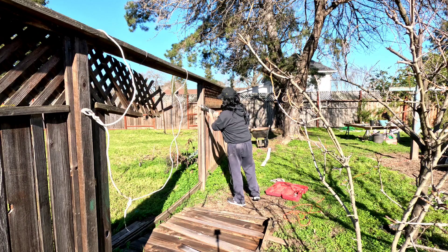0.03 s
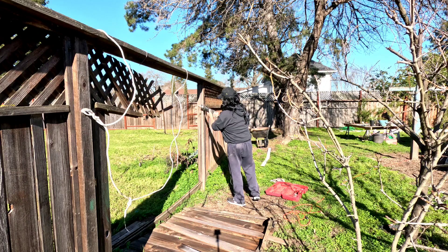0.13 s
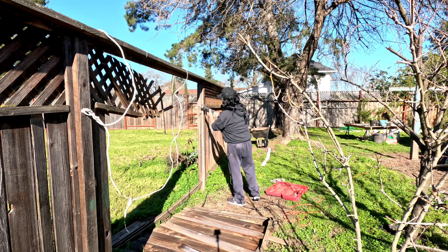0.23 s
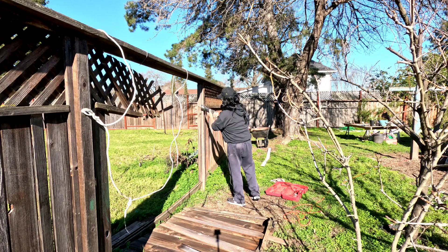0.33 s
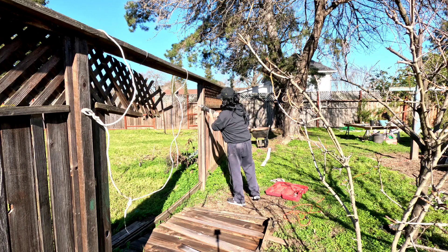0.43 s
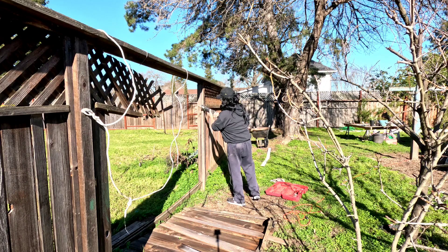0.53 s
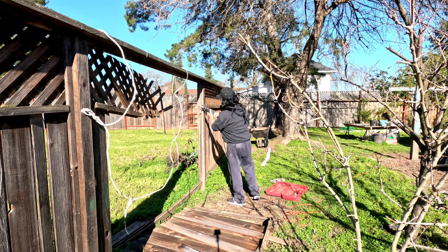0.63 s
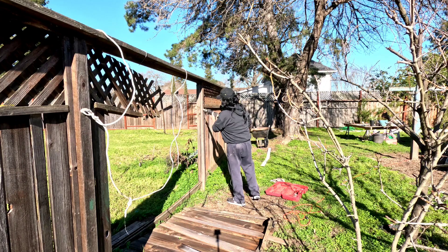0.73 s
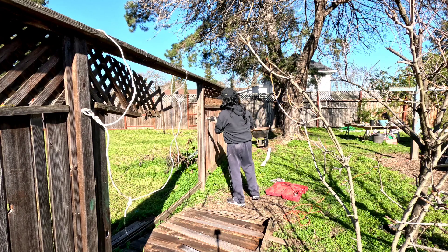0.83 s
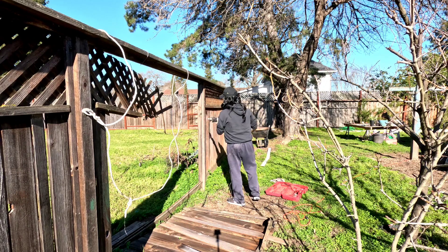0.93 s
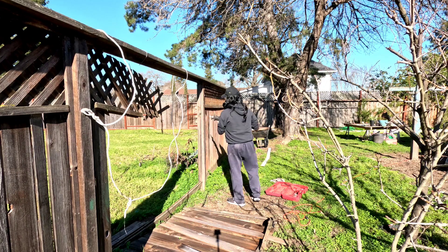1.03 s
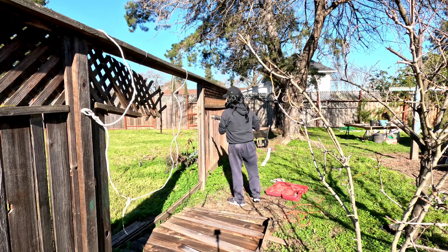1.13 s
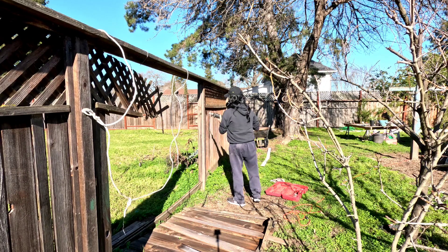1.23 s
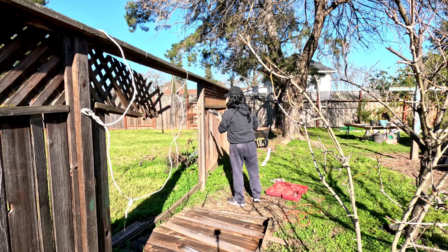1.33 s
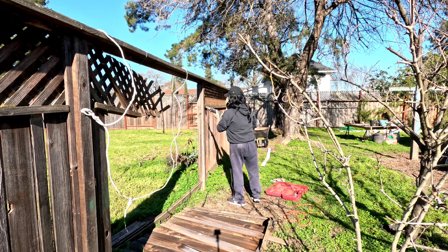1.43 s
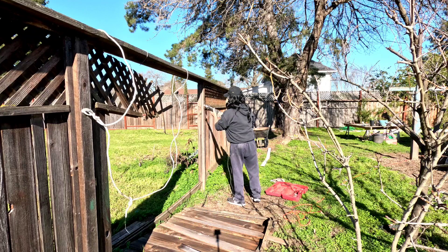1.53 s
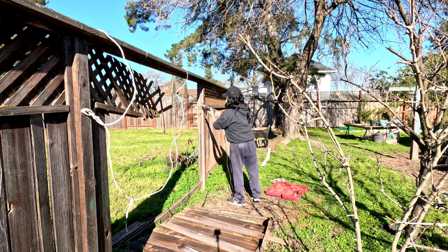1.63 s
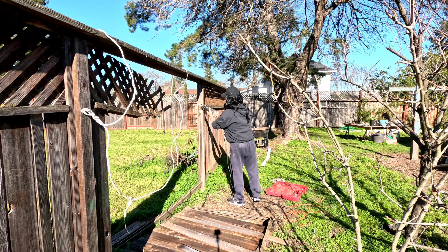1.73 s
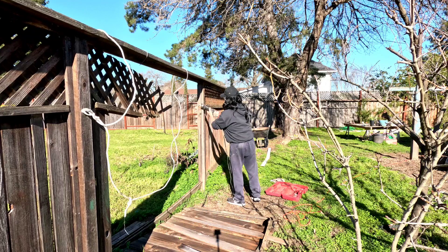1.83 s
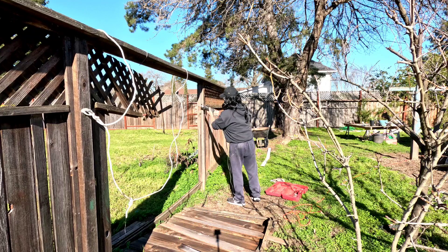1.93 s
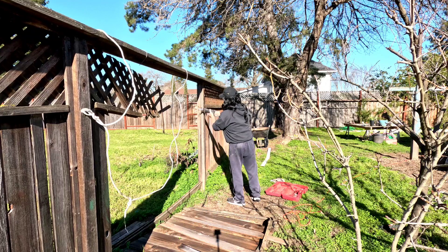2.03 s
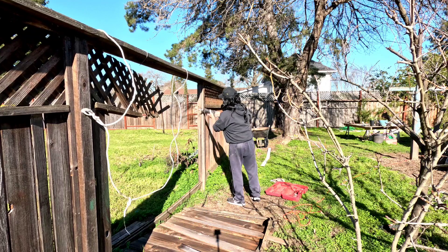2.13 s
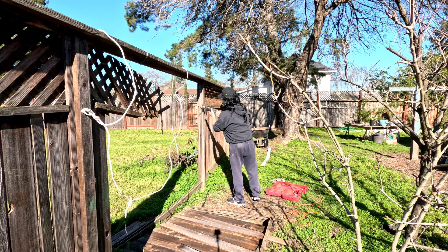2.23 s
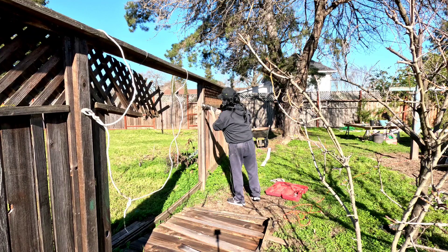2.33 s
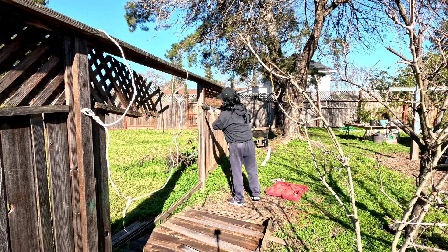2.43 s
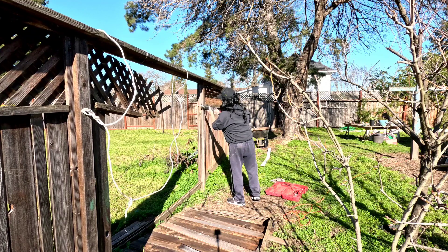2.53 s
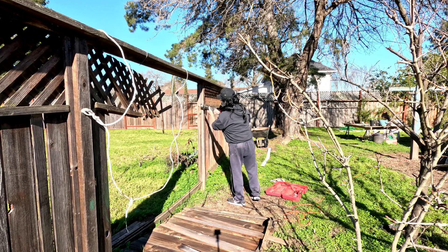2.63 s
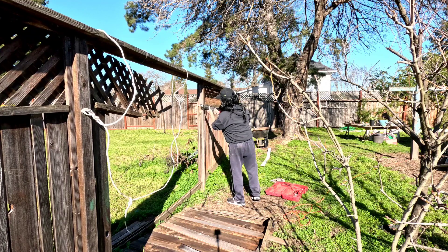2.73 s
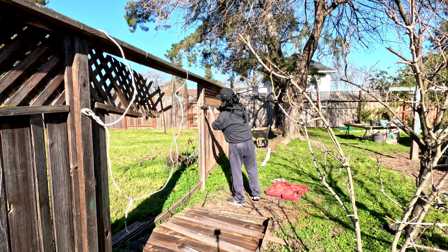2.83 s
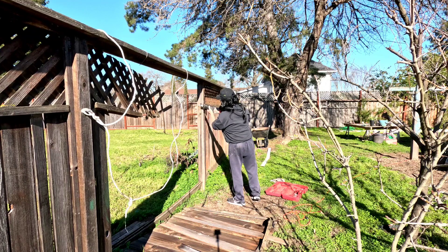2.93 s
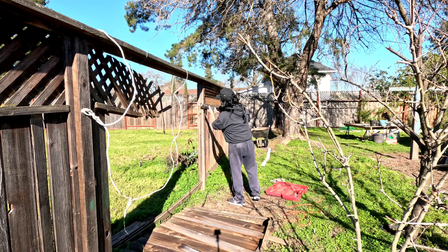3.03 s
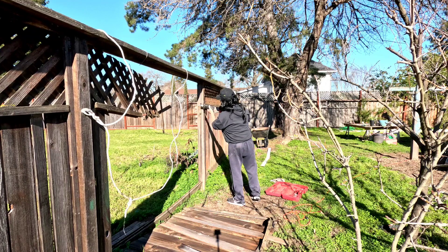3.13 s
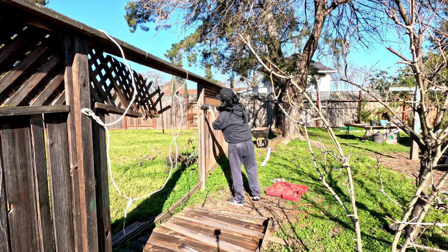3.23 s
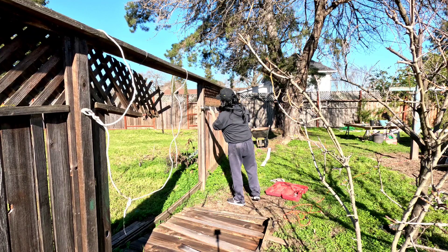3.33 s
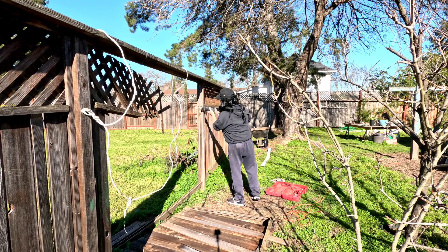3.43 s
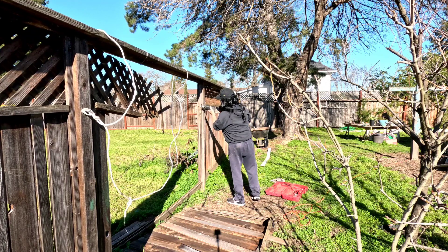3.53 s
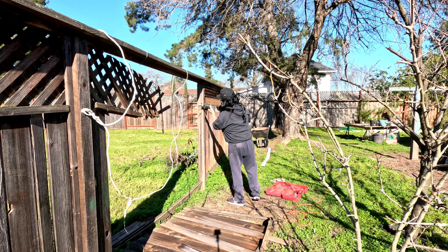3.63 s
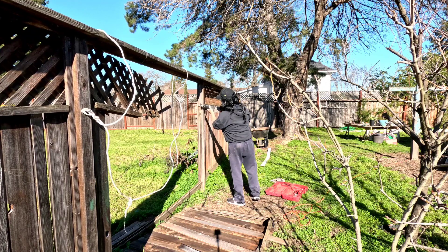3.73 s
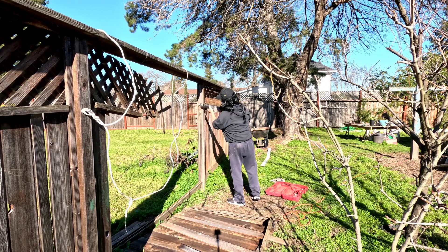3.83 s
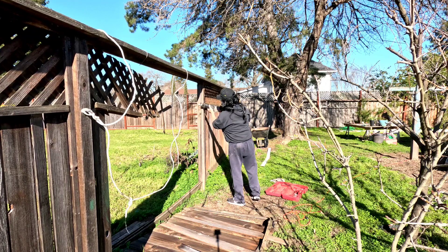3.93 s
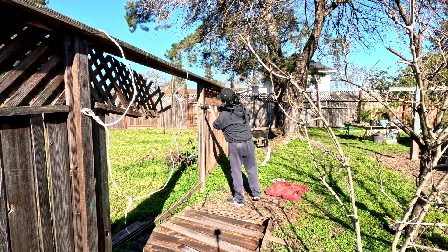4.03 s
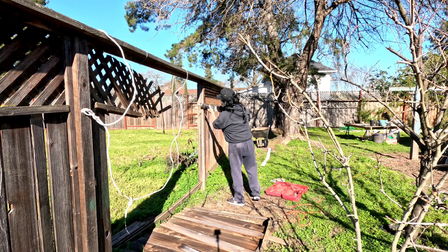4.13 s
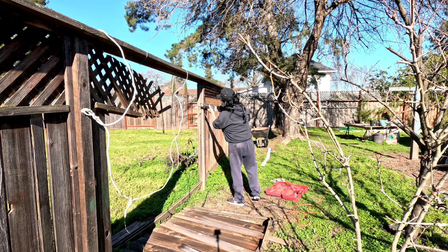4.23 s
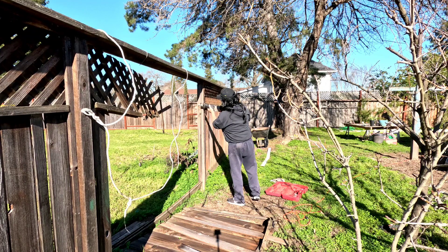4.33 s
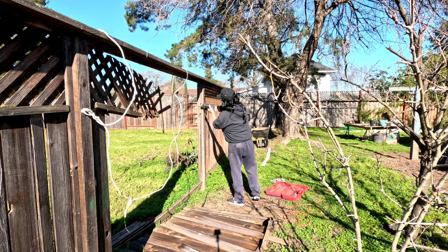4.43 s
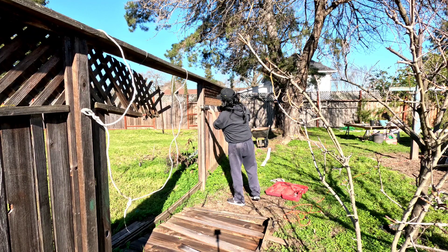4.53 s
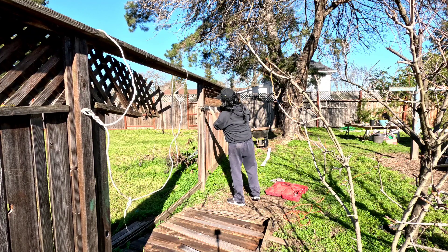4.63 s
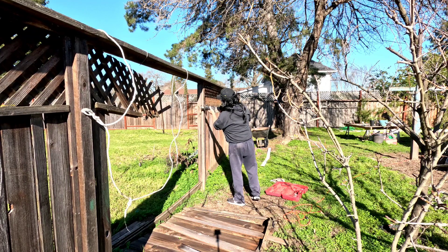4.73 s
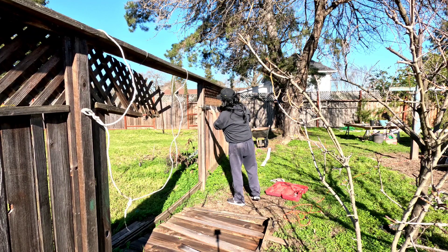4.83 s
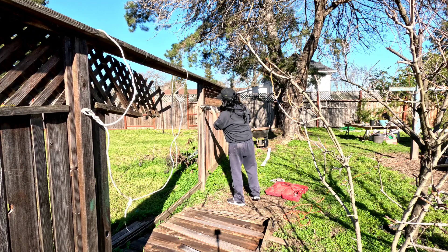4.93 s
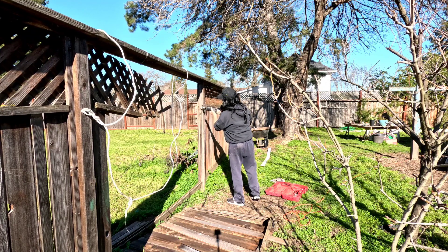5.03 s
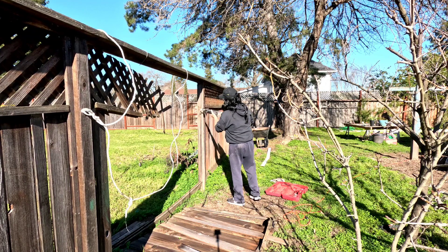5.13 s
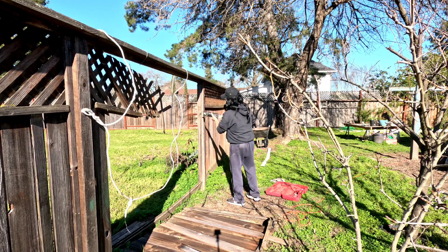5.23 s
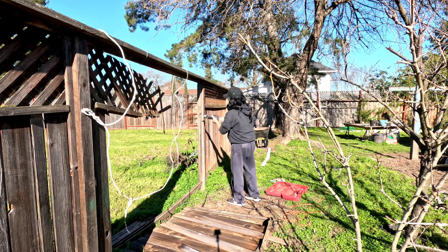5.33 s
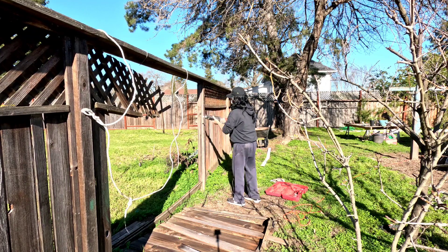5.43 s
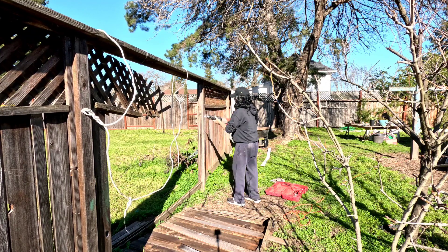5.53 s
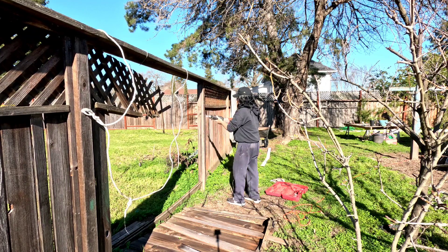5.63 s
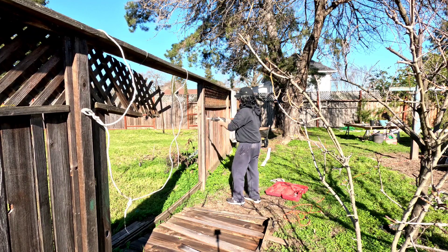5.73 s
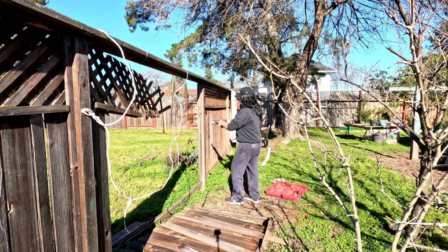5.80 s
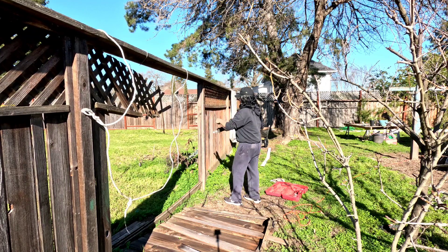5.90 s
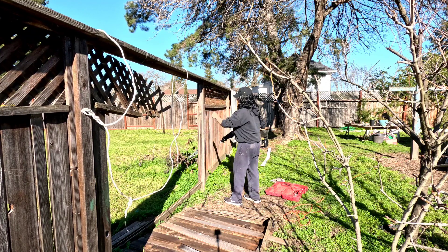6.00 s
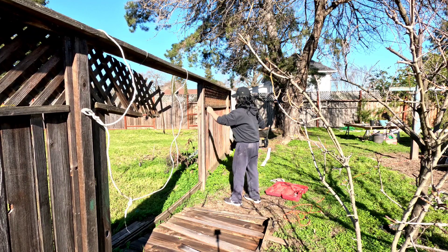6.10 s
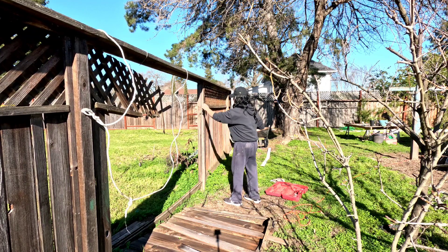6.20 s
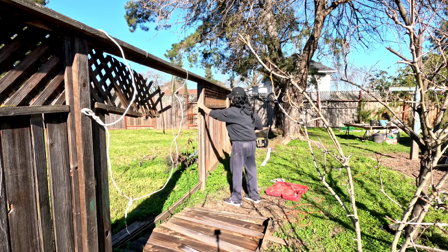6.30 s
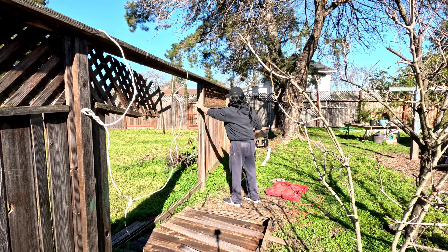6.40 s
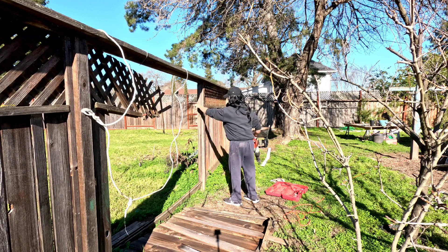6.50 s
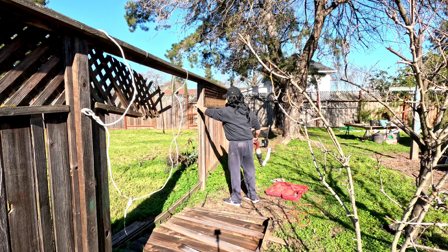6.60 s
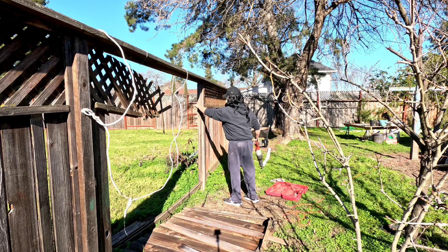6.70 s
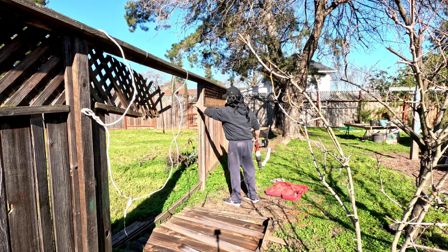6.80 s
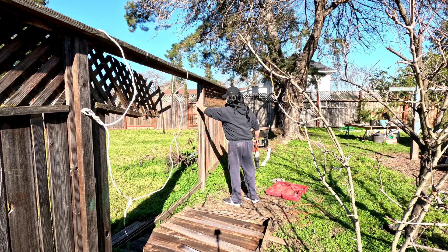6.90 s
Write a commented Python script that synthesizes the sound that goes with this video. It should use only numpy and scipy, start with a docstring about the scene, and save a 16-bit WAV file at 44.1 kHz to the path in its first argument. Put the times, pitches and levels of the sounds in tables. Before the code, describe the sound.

A reciprocating saw rasps harshly through a screw in a wooden fence, coasts, revs again with sharp board knocks, then winds down to slow clatter.

```python
"""A reciprocating saw cuts a screw in a wooden fence, a few metres away in a back yard, heard at two close ports.
The teeth rasp to and fro and shake the boards until the screw gives: noise rings the blade, tones move the boards.
The motor coasts, is run up again and rattles at full speed while the blade knocks three times against the fence,
then winds down to a slow clatter. Rattle and hiss are dense impacts, the whine follows the motor speed,
and the knocks ring the boards. Echoes come off the fences over a low outdoor rumble and a faint hum."""
import sys
import numpy as np
from scipy import signal
from scipy.fft import rfft, irfft
from scipy.io import wavfile
from scipy.ndimage import uniform_filter1d, map_coordinates

SR = 44100
rng = np.random.default_rng(int(sys.argv[2]) if len(sys.argv) > 2 else 0)


def persist_wave(psi):
    """Save psi, clipped to +-1, as 16-bit WAV."""
    counts = np.round(np.clip(psi, -1, 1) * 32767).astype(np.int16)
    wavfile.write(sys.argv[1], SR, np.atleast_2d(counts).T)


N = 306936
TIME = np.arange(N) / SR
FREQS = np.maximum(np.fft.rfftfreq(N, 1 / SR), 1)

# Motor speed is given as the pitch of its gear whine: running free, and in the cut.
FREE_HZ, CUT_HZ = 9040, 8718
WHINE_PER_STROKE, WHINE_PER_TURN = 198.5, 20  # whine cycles per blade stroke and per shaft turn
CUT_END_S = .875
# The screw works loose between these times.
LOOSEN_S, LOOSE_S = 0.25, 0.8
# Share of the rasp's power that repeats from stroke to stroke.
STEADY_TIGHT, STEADY_LOOSE = .66, .22
RASP_DB = -13.5
BOOM_TIGHT_DB, BOOM_LOOSE_DB = -30, -22.5
BUZZ_TIGHT_DB, BUZZ_LOOSE_DB = -29, -33

# Blade resonances, each rung at its own place in the stroke.
# Each row: pitch in Hz, width in Hz, relative level in dB, place in the stroke from 0 to 1.
BLADE_RESONANCES = [(908, 24, 3.5, 0.63), (1300, 41, 9, 1), (1815, 34, 10.5, 0.73), (2340, 250, 8, 0.08),
                    (2820, 570, 0, 0.67), (2883, 67, 13, 1), (3280, 92, -12, 0.8), (3830, 400, -4, 0.77),
                    (4860, 190, 8, 0.54), (5600, 360, 3.5, 0.64), (5960, 200, -5.5, 0.68),
                    (7070, 960, -4.5, 0.97), (8870, 160, -0.5, 0.91), (9870, 290, -5, .93)]
# Colour of the teeth against the screw. Each row: frequency in Hz, relative density in dB per Hz.
RASP_COLOUR = [(240, -49), (400, -13), (795, -4), (898, 3), (1110, -6), (1310, -1), (2050, -2), (2240, 0),
               (2910, 1), (4060, -4), (4880, -0.5), (6520, -12.5), (10300, -14), (14000, -25), (15300, -54)]
# Motion of the shaken boards, five slow tones that boom and then those that buzz.
# Each row: multiple of the stroke rate, relative level in dB.
BOARD_ORDERS = [(1, -18), (2, -8), (3, -1), (4, 1), (5, -10), (6, 4), (7, -24), (8, 3), (9, -8), (10, -18),
                (11, -33), (12, -6)]


def cutting(strokes):
    """Teeth ring the blade at a firm and a lighter touch in each stroke, and the screw shakes the boards."""
    boom_db = loosening(BOOM_TIGHT_DB, BOOM_LOOSE_DB)
    buzz_db = loosening(BUZZ_TIGHT_DB, BUZZ_LOOSE_DB)
    loose = 1 - loosening(STEADY_TIGHT, STEADY_LOOSE)
    bite = teeth(strokes) * from_db(2.6 * loose * drift(30))
    shaken = strokes + 0.024 * loose * drift(68)

    ringing = 0
    for hz, width, db, place in BLADE_RESONANCES:
        touch = lobe(shaken, place, width=.072) + .16
        ringing = ringing + resonance(bite * touch, hz, width, db)
    ringing = rms_one(signal.sosfilt(signal.butter(6, 10500, fs=SR, output="sos"), ringing))

    firm = lobe(shaken, centre=.955, width=.06)
    light = .42 * lobe(shaken, centre=.61, width=.08)
    contact = firm + light + .2
    scraping = colour(teeth(strokes) * contact, RASP_COLOUR)
    rasp = from_db(-2.5) * ringing + from_db(-4.5) * scraping

    tones = []
    for order, db in BOARD_ORDERS:
        tones.append(from_db(db) * np.sin(2 * np.pi * (round(order) * shaken + rng.random())))
    boom, buzz = rms_one(sum(tones[:5])), rms_one(sum(tones[5:]))
    boards = from_db(boom_db) * boom + from_db(buzz_db) * buzz
    boards *= 1 + 0.13 * loose * drift(60)
    until_cut_ends = np.clip((CUT_END_S - TIME) / .014, 0, 1)
    return (from_db(RASP_DB) * rasp + boards) * until_cut_ends


def teeth(strokes):
    """The same teeth cross the screw on every stroke, less exactly as the screw loosens."""
    steady = loosening(STEADY_TIGHT, STEADY_LOOSE)
    place = strokes % 1 * SR * WHINE_PER_STROKE / CUT_HZ
    pattern = rms_one(map_coordinates(rng.standard_normal(2048), [place], order=3, mode="wrap"))
    return np.sqrt(steady) * pattern + np.sqrt(1 - steady) * grains(per_s=9000, spread_db=3)


def loosening(tight, loose):
    """Glide from one value to the other as the screw works loose."""
    return np.interp(TIME, [LOOSEN_S, LOOSE_S], [tight, loose])


# Trigger held. Each row: pressed in seconds, let go in seconds.
TRIGGER_HELD = [(0, 1.15), (2.0, 5.01)]


def powered():
    """1 while the trigger is held, 0 while the motor coasts."""
    return sum((TIME >= on) & (TIME < off) for on, off in TRIGGER_HELD) * 1.0


# From this time the screw binds and slows the motor steadily.
BIND_S, BIND_HZ_PER_S = .55, 520
# Time constants of spin-up near free speed and of coasting; the pull doubles at a lag of HARD_PULL_HZ.
SPIN_UP_S, HARD_PULL_HZ, COAST_S = .45, 2440, 1.5
STEP_S = .001

# Blade striking the fence. Each row: start in seconds, crack level in dB, thud level in dB,
# loss per rebound in dB, motor speed lost in Hz of whine (negative is a gain).
KNOCKS = [(0.883, 4, -5, 35, 650.5), (0.913, -33, -3, 8, 0), (0.986, -24, -13.5, 16, 0),
          (1.028, -15.5, -16, 12, 0.5), (2.205, 6, -2.5, 29, 0), (2.263, -24, -14, 8, -0.5),
          (3.483, 1.5, 0, 7, 140.5), (4.688, 2, 3.5, 12, 159.5)]


def motor_speed(power):
    """The screw holds the motor back; then power pulls it to free speed, friction slows it, knocks check it."""
    ticks = np.arange(0, TIME[-1], STEP_S)
    checks = {int(s / STEP_S): lost_hz for s, *_, lost_hz in KNOCKS}
    speeds = []
    for tick, (s, on) in enumerate(zip(ticks, np.interp(ticks, TIME, power))):
        if s < CUT_END_S:
            hz = CUT_HZ - BIND_HZ_PER_S * max(s - BIND_S, 0)
        else:
            lag = FREE_HZ - hz
            pull = lag * (1 + lag / HARD_PULL_HZ) / SPIN_UP_S
            friction = -hz / COAST_S
            hz += STEP_S * (pull if on else friction) - checks.get(tick, 0)
        speeds.append(hz)
    return np.interp(TIME, ticks, speeds)


# Running mechanism: level before the gains below, and rise with speed.
RATTLE_DB, RATTLE_DB_PER_OCTAVE = -19.5, 8
HISS_DB, HISS_DB_PER_OCTAVE = -23, 13.5
# Gain under power (rattle, hiss), and gain at full motor effort.
POWER_DB, HISS_POWER_DB, EFFORT_DB = 1, 1.5, 10
FULL_SLACK = 0.55  # share of the rattle in clacks at the stroke ends, approached as the motor slows
HISS_FACING = 1.23  # the treble is screened more
CLACK_RING_DB, CLACK_RING_HZ, CLACK_RING_WIDTH_HZ = -29.5, 2780, 350

# The saw is turned about and screened by the body. Each row: time in seconds, level towards the listener in dB.
FACING = [(.9, -6.5), (1.06, -9), (1.27, -8.5), (1.95, 2.5), (2.35, -1.5), (3.05, 1.73), (3.75, 0),
          (4.6, 1.5), (4.85, -1.67), (6.08, 3.1), (6.5, -1), (6.96, 2.5)]
# Colour of the mechanism at speed. Each row: frequency in Hz, relative density in dB per Hz.
RATTLE_COLOUR = [(71, -1), (120, -12), (189, -6.5), (250, -14.5), (452, -13), (580, -15), (805, -4.5),
                 (1050, -5), (1150, -4.5), (1230, -3), (2260, -0.5), (3130, -1), (3380, -4), (4210, -5),
                 (5000, -11.5), (6500, -72), (11000, -120)]
# Colour of the mechanism when slow. Each row: frequency in Hz, relative density in dB per Hz.
COASTING_COLOUR = [(300, -8.5), (450, -16.5), (550, -11), (770, -7), (900, -4), (1000, -4.5), (1200, -1),
                   (1400, -3.5), (1750, -4.5), (2000, -7.5), (2200, -4), (3000, -4.5), (3500, -7),
                   (5000, -14)]
# Colour of its fine treble. Each row: frequency in Hz, relative density in dB per Hz.
HISS_COLOUR = [(3000, -0.5), (4200, -8), (5100, 1), (6000, -3.5), (7400, -3.5), (8300, -7), (9400, -7.5),
               (10200, -5), (11000, -12.5), (12000, -19.5), (14200, -22.5), (15000, -93)]


def mechanism(strokes, whine_hz, trigger, take_up_s=0.033, clack_place=0.25):
    """Gears and slider rattle densely at speed; as they slow, the two clacks of each stroke stand apart."""
    power = fade(trigger, take_up_s) / (take_up_s * SR)
    slowness, octaves = 1 - whine_hz / FREE_HZ, np.log2(whine_hz / FREE_HZ)
    effort = power * slowness
    facing_db, = in_time(FACING)
    rattle_db = RATTLE_DB + RATTLE_DB_PER_OCTAVE * octaves + POWER_DB * power
    rattle_db = rattle_db + EFFORT_DB * effort + facing_db
    hiss_db = HISS_DB + HISS_DB_PER_OCTAVE * octaves + HISS_POWER_DB * power
    hiss_db = hiss_db + EFFORT_DB * effort + HISS_FACING * facing_db

    slack = np.clip(FULL_SLACK * slowness, 0, 1)
    one_end = lobe(strokes, clack_place, width=.085)
    other_end = .95 * lobe(strokes, clack_place + .5, width=.075)
    clacks = rms_one(one_end + other_end)
    beat = np.sqrt(1 - slack + slack * (clacks * from_db(.9 * drift(25))) ** 2)

    fast = np.clip((whine_hz - 3500) / 5000, 0, 1)
    rattle = np.sqrt(fast) * colour(beat * grains(per_s=8000, spread_db=2.5), RATTLE_COLOUR)
    rattle += np.sqrt(1 - fast) * colour(beat * grains(per_s=7000, spread_db=3.0), COASTING_COLOUR)

    hiss = colour(np.sqrt(beat) * grains(per_s=22000, spread_db=4.0), HISS_COLOUR)
    dull = rms_one(resonance(hiss, hz=5230, width=4000, db=0))  # slow impacts lose their top
    bright = np.clip((whine_hz - 2800) / 3000, .15, 1)
    hiss = bright * hiss + (1 - bright) * dull

    clack_noise = colour(clacks ** 2 * rng.standard_normal(N), COASTING_COLOUR)
    ring = slack * rms_one(resonance(clack_noise, CLACK_RING_HZ, CLACK_RING_WIDTH_HZ, db=0))
    impacts = from_db(rattle_db) * rattle + from_db(hiss_db) * hiss
    impacts += from_db(CLACK_RING_DB + facing_db) * ring
    after_cut = np.clip((TIME - CUT_END_S) / 0.0013, 0, 1)
    return after_cut * impacts + motor(whine_hz, beat, power, effort)


# Gains at full motor effort, and housing levels under power and coasting.
WHINE_EFFORT_DB, HOUSING_EFFORT_DB = 33, 28
HOUSING_POWERED_DB, HOUSING_COASTING_DB = -37, -37
HUSH_HZ, HUSH_DB_PER_OCTAVE = 3340, 22  # below this motor speed the lesser tones die away

# How the gearbox radiates its whine. Each row: whine pitch in Hz, level in dB.
WHINE_COLOUR = [(2400, -47), (3200, -46), (3900, -57), (4600, -40), (4950, -35), (5350, -46), (6600, -38),
                (7100, -37.5), (7700, -35.5), (8200, -37.5), (9000, -43)]
# The whine swells and fades. Each row: time in seconds, gain in dB.
WHINE_SWELL = [(.9, -22), (1.1, 1), (1.8, -9), (2.15, 0), (2.5, 1.5), (2.75, 12.5), (3.15, -16), (3.85, 13),
               (4.2, 5), (4.6, 7.5), (6, 2.5)]
# Lesser motor tones. Each row: multiple of the shaft speed, relative level in dB.
MOTOR_ORDERS = [(5, -2.5), (13, 0), (16, 7), (18, 7.5)]
# Resonances of the saw housing. Each row: pitch in Hz, width in Hz, gain in dB.
HOUSING_RESONANCES = [(940, 40, -13), (1165, 23, 1), (1404, 200, 10), (1940, 190, 1), (2470, 370, -8),
                      (3000, 230, -8), (4570, 220, 1)]


def motor(whine_hz, beat, power, effort):
    """Gear whine follows the shaft; lesser tones flare as they sweep through the housing's resonances."""
    hz, db = np.transpose(WHINE_COLOUR)
    swell_db, = in_time(WHINE_SWELL)
    whine_db = np.interp(whine_hz, hz, db) + swell_db + WHINE_EFFORT_DB * effort
    ring_db = power * HOUSING_POWERED_DB + (1 - power) * HOUSING_COASTING_DB + HOUSING_EFFORT_DB * effort
    ring_db += HUSH_DB_PER_OCTAVE * np.minimum(np.log2(whine_hz / HUSH_HZ), 0)

    turns = np.cumsum(whine_hz * (1 + .0016 * drift(70))) / SR / WHINE_PER_TURN
    whine = from_db(whine_db + 3.7 * drift(25)) * np.sin(2 * np.pi * WHINE_PER_TURN * turns)
    jerked = turns + 0.011 * drift(57)
    tones = 0
    for order, db in MOTOR_ORDERS:
        tones = tones + from_db(db + 2 * drift(40)) * np.sin(2 * np.pi * round(order) * jerked)
    # the plastic shell passes little treble
    driven = signal.sosfilt(signal.butter(4, 5000, fs=SR, output="sos"), tones * beat ** 2)
    return whine + from_db(ring_db) * sum(resonance(driven, *mode) for mode in HOUSING_RESONANCES)


REBOUND_STROKES = 2
GLANCING_DB = 3  # further loss of every rebound's crack

# Colour of the metal crack. Each row: frequency in Hz, relative density in dB per Hz.
CRACK_COLOUR = [(200, 14), (700, -8.5), (1500, 7), (3200, 7), (5000, 8.5), (7000, -2.5), (10000, 0),
                (12000, -38), (15000, -36)]
# Loose boards trembling after a blow. Each row: frequency in Hz, relative density in dB per Hz.
TREMBLE_COLOUR = [(80, 7), (130, -5), (220, 2), (320, -1), (430, -6), (620, -8.5), (900, -4.5)]
# Fence boards. Each row: pitch in Hz, gain in dB, time to fall by 60 dB in seconds.
FENCE_MODES = [(91.5, -11, 0.098), (136, -1.5, 0.069), (173, -11.5, 0.1), (223, -3, 0.056),
               (315, -1.5, 0.056), (356, -11, 0.038), (460, -8.5, 0.037), (586, 4.5, 0.019)]


def knocks(whine_hz, crack_s=0.0041, flex_s=0.00893, push_s=0.0014, tremble_s=0.064, tremble_db=-21):
    """A metal crack, then the boards flex, thud and tremble; the blade rebounds every other stroke, ever weaker."""
    cracks, pushes = np.zeros(N), np.zeros(N)
    for s, crack_db, thud_db, loss_db, _ in KNOCKS:
        rebound_s = REBOUND_STROKES * WHINE_PER_STROKE / whine_hz[int(s * SR)]
        for k in range(4):
            hit_s = s + k * rebound_s
            cracks[int(hit_s * SR)] += from_db(crack_db - k * loss_db - (k > 0) * GLANCING_DB)
            pushes[int((hit_s + flex_s) * SR)] += from_db(thud_db - k * loss_db)
    out = fade(cracks, crack_s) * colour(rng.standard_normal(N), CRACK_COLOUR)
    out += from_db(tremble_db) * fade(pushes, tremble_s) * colour(rng.standard_normal(N), TREMBLE_COLOUR)
    force = fade(pushes, push_s) / (push_s * SR)
    # an open fence radiates little deep bass
    force = signal.sosfilt(signal.butter(2, 80, "high", fs=SR, output="sos"), force)
    for hz, db, t60 in FENCE_MODES:
        r, w = np.exp(-np.log(1000) / (t60 * SR)), 2 * np.pi * hz / SR
        out += from_db(db) * signal.lfilter([0, np.sin(w)], [1, -2 * r * np.cos(w), r * r], force)
    return out


BRUSH_THRUM_DB = -10  # the boards hum along, against the scrape

# The blade brushes the gap beside the post.
# Each row: firmest touch in seconds, half length in seconds, level in dB.
BRUSHES = [(2.126, 0.054, -22), (3.044, 0.32, -23.5), (4.2, 0.79, -37.5)]
# Resonances of the scrape. Each row: pitch in Hz, width in Hz, relative level in dB.
BRUSH_RESONANCES = [(1900, 150, -6), (2295, 290, 9), (2980, 400, -5), (3740, 83, -13), (4630, 140, -13)]


def brushing(strokes):
    """The free blade grazes the wood once a stroke and the boards thrum; each touch swells and eases off."""
    touch = sum(from_db(db) * bump(s, half_s) for s, half_s, db in BRUSHES)
    fibres = grains(per_s=6000, spread_db=3.5)
    graze = fibres * (lobe(strokes, centre=0.44, width=0.12) + 0.096)
    scrape = rms_one(sum(resonance(graze, *mode) for mode in BRUSH_RESONANCES))
    return touch * (scrape + from_db(BRUSH_THRUM_DB) * colour(graze, TREMBLE_COLOUR))


# Separate clacks of the loose blade late in the slowing run-down. Each row: start in seconds, level in dB.
LATE_CLACKS = [(6.751, -27), (6.855, -19), (6.9, -21), (6.942, -23)]
# Blade clamp. Each row: pitch in Hz, width in Hz, relative level in dB.
CLAMP_RESONANCES = [(2000, 81, 9), (2700, 220, -3)]


def late_clacks(clack_s=0.0083):
    """Each clack is a short, dull burst of noise coloured by the blade clamp's resonances."""
    hits = np.zeros(N)
    for s, db in LATE_CLACKS:
        hits[int(s * SR)] = from_db(db)
    noise = colour(rng.standard_normal(N), COASTING_COLOUR)
    return fade(hits, clack_s) * rms_one(sum(resonance(noise, *mode) for mode in CLAMP_RESONANCES))


YARD_T60_S = .3  # time for the scatter to fall by 60 dB

# Nearby boards and ground. Each row: delay in seconds, level against the direct sound in dB.
ECHOES = [(.0021, -29), (.0057, -23), (0.013, -26)]
# Scatter from fences and trees. Each row: frequency in Hz, level against the direct sound in dB.
SCATTER = [(60, -24), (250, -16), (500, -12), (1000, -9.5), (3000, -9.5), (8000, -9), (13000, -7)]
# Lead between the microphone ports. Each row: frequency in Hz, phase by which left leads in radians.
PORT_PHASE = [(30, 0), (300, -.05), (1000, -.2), (3300, -.45), (12000, -.45)]
# Balance of the microphone ports. Each row: frequency in Hz, left minus right in dB.
PORT_BALANCE = [(60, 0.0), (110, -2.5), (200, -1), (380, -0.5), (700, -1.0), (1280, -0.5), (2370, -1),
                (4370, 0.0), (8060, 0.0), (14900, 0.5)]


def yard(x):
    """Close echoes and a thin scatter from fences and trees reach two closely spaced ports."""
    left_right = np.array([[1], [-1]])
    age = TIME[:SR // 2]
    response = rng.standard_normal((2, len(age))) * np.exp(-np.log(1000) * age / YARD_T60_S)
    response /= np.sqrt(np.sum(response ** 2, axis=1, keepdims=True))
    scatter = rfft(signal.fftconvolve(x[None], response, axes=1)[:, :N]) * from_db(per_bin(SCATTER))
    direct = x + sum(from_db(db) * np.interp(TIME - s, TIME, x, left=0) for s, db in ECHOES)
    ports = rfft(direct) * np.exp(.5j * per_bin(PORT_PHASE) * left_right)
    balance = from_db(.5 * per_bin(PORT_BALANCE) * left_right - .5)
    return irfft((ports + scatter) * balance, N)


RUMBLE_DB = -39
# The hum swells late, up to its full level at HUM_FULL_S.
HUM_HZ, HUM_DB, HUM_FULL_S, HUM_RISE_S = 206, -42.5, 6.6, 0.33

# Slow rises and dips of the low rumble. Each row: middle in seconds, half length in seconds, dB added.
RUMBLE_SWELLS = [(1.9, 0.14, 6), (2.95, 0.58, 4), (5.3, 0.44, -2.5), (6.95, 0.37, 3)]
# Colour of the outdoor rumble. Each row: frequency in Hz, relative density in dB per Hz.
RUMBLE_COLOUR = [(22, -3.5), (40, -7.5), (55, -4.5), (75, -6.5), (105, -8), (140, -14.5), (280, -29.5),
                 (500, -23.5)]


def background():
    """Low outdoor rumble is coloured noise; the faint hum is one tone of wavering level."""
    rumble_db = RUMBLE_DB + sum(db * bump(s, half_s) for s, half_s, db in RUMBLE_SWELLS)
    rumble = from_db(rumble_db) * colour(rng.standard_normal(N), RUMBLE_COLOUR)
    swell = np.exp(np.minimum(TIME - HUM_FULL_S, 0) / HUM_RISE_S)
    hum = swell * from_db(HUM_DB + 2 * drift(1.4)) * np.sin(2 * np.pi * HUM_HZ * TIME)
    return rumble + hum


def from_db(db):
    """Decibels to gain."""
    return 10 ** (np.asarray(db) / 20)


def rms_one(x):
    """Scale to unit power."""
    return x / np.sqrt(np.mean(x ** 2) + 1e-20)


def in_time(rows):
    """Each column of a curve at every sample."""
    s, *columns = np.transpose(rows)
    return [np.interp(TIME, s, c) for c in columns]


def per_bin(points):
    """A table over log frequency, read at every spectral bin."""
    hz, value = np.transpose(points)
    return np.interp(np.log(FREQS), np.log(hz), value)


def colour(x, spectrum):
    """Give x a spectrum that falls away beyond its ends; rms 1."""
    low_skirt = 1 + (.8 * spectrum[0][0] / FREQS) ** 8
    high_skirt = 1 + (FREQS / spectrum[-1][0] / 1.2) ** 12
    skirts = 1 / np.sqrt(low_skirt * high_skirt)
    return rms_one(irfft(rfft(x) * from_db(per_bin(spectrum)) * skirts, N))


def drift(rate):
    """Slow chance with a spread of 1, weakening above the rate in Hz."""
    hz = np.fft.rfftfreq(8192, TIME[-1] / 8192)
    slow = rms_one(irfft(rfft(rng.standard_normal(8192)) / (1 + (hz / rate) ** 2)))
    return np.interp(TIME, np.linspace(0, TIME[-1], len(slow)), slow)


def grains(per_s, spread_db):
    """Dense tiny impacts of uneven size; rms 1."""
    sizes = from_db(spread_db * np.minimum(rng.exponential(1, N), 4)) * rng.choice([-1, 1], N)
    return rms_one(sizes * (rng.random(N) < per_s / SR))


def lobe(strokes, centre, width):
    """A smooth bump once per stroke; centre and width in strokes."""
    return np.exp((np.cos(2 * np.pi * (strokes - centre)) - 1) / (2 * np.pi * width) ** 2)


def bump(s, half_s):
    """A smooth swell of height 1."""
    return np.exp(-((TIME - s) / half_s) ** 2)


def fade(pulses, seconds):
    """Each pulse starts an exponential decay of its own height."""
    return signal.lfilter([1], [1, -np.exp(-1 / (seconds * SR))], pulses + 1e-18)


def resonance(x, hz, width, db):
    """A two-pole band-pass with the given gain on top."""
    r = np.exp(-np.pi * width / SR)
    poles = [1, -2 * r * np.cos(2 * np.pi * hz / SR), r * r]
    return from_db(db) * (1 - r * r) / 2 * signal.lfilter([1, 0, -1], poles, x)


def scene():
    """The trigger sets the motor speed, which drives the strokes, the rattle and the whine."""
    trigger = powered()
    whine_hz = motor_speed(trigger)
    strokes = np.cumsum(whine_hz) / SR / WHINE_PER_STROKE
    saw = cutting(strokes) + mechanism(strokes, whine_hz, trigger) + late_clacks()
    return yard(saw + brushing(strokes) + knocks(whine_hz)) + background()


CUTOFF_HZ = 14800


def record(dry, limit_db=-9.5, release_db_per_s=80, attack_s=0.00038):
    """A limiter lets each crack overload, ducks behind it and recovers slowly; the top is cut."""
    power = uniform_filter1d(np.mean(dry ** 2, axis=0), size=132)  # 3 ms
    over = np.maximum(10 * np.log10(np.maximum(power, 1e-12)) - limit_db, 0)
    release = release_db_per_s * TIME
    held = np.maximum.accumulate(over + release) - release
    duck_db = -fade(held, attack_s) / (attack_s * SR)
    limited = np.clip(dry * from_db(duck_db), -1, 1)
    return signal.sosfilt(signal.ellip(10, .1, 80, CUTOFF_HZ, fs=SR, output="sos"), limited)


dry = scene()
out = record(dry)
persist_wave(out)
```